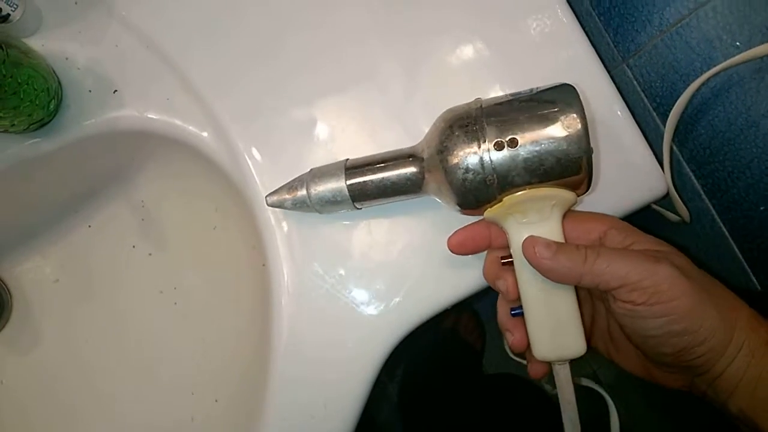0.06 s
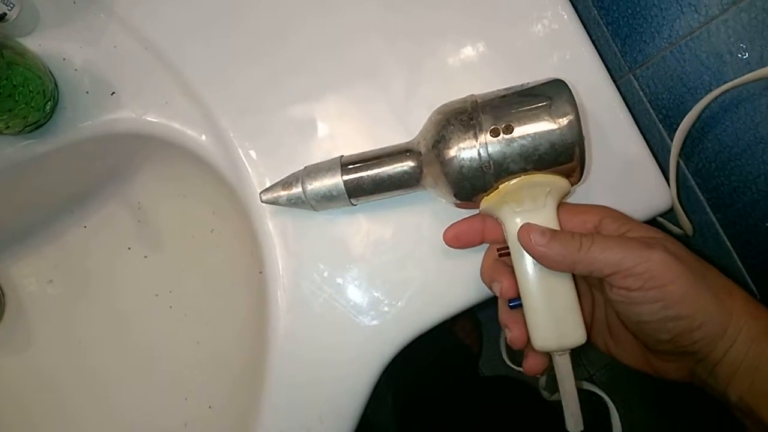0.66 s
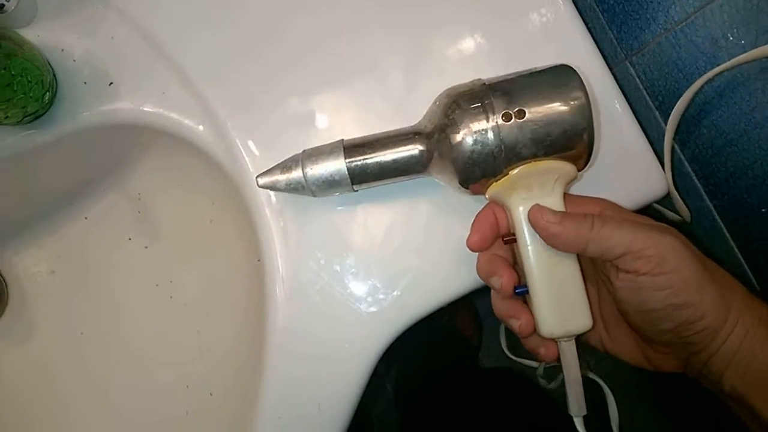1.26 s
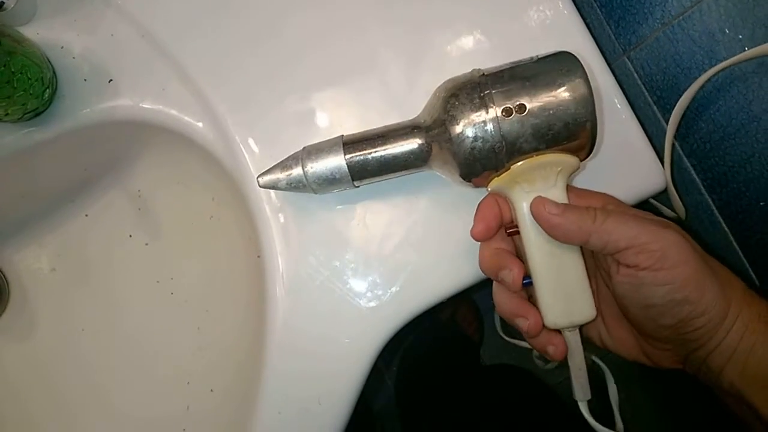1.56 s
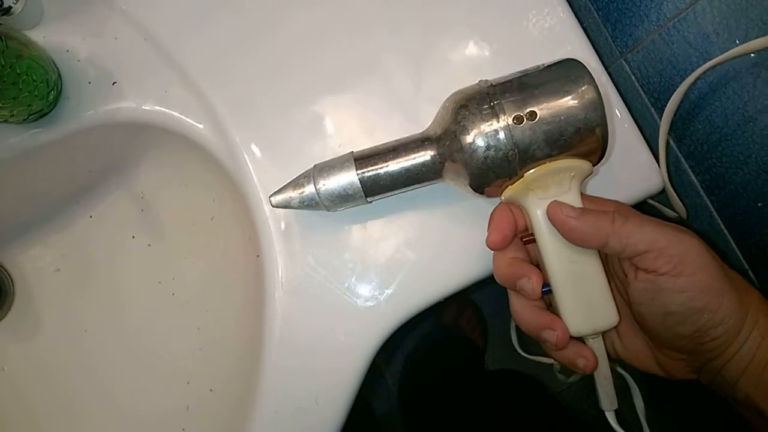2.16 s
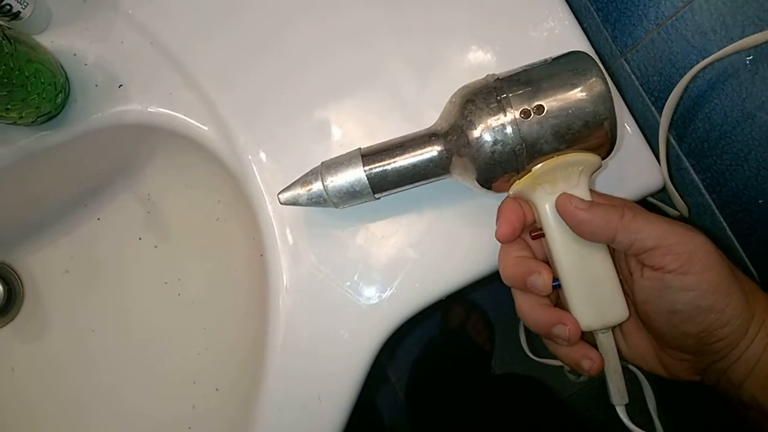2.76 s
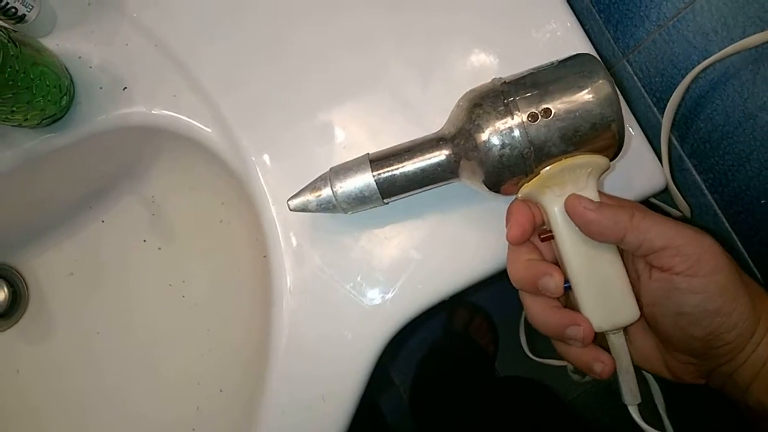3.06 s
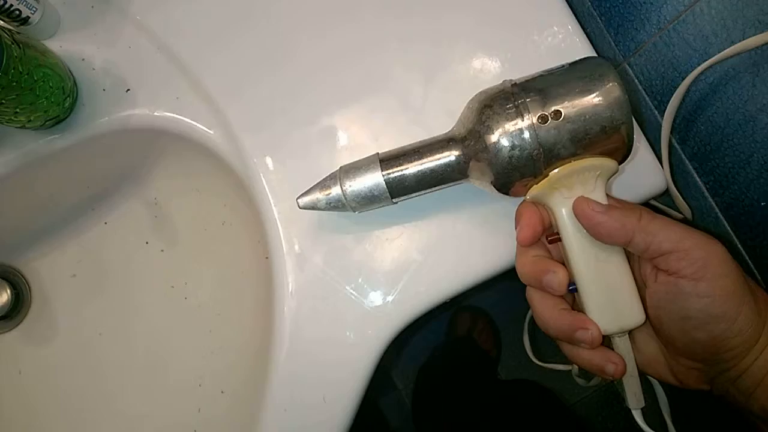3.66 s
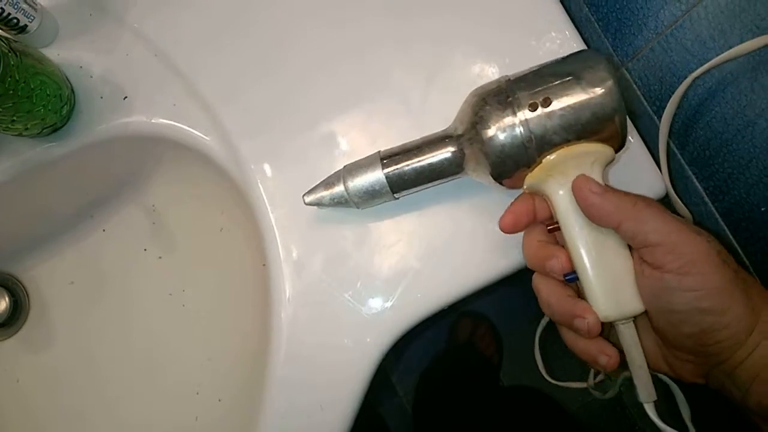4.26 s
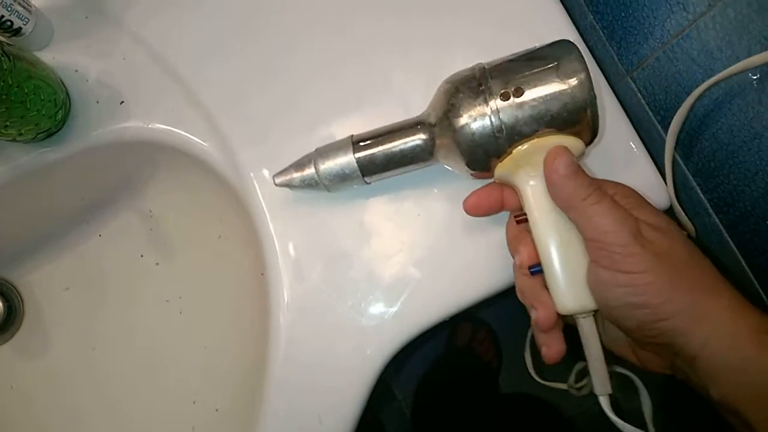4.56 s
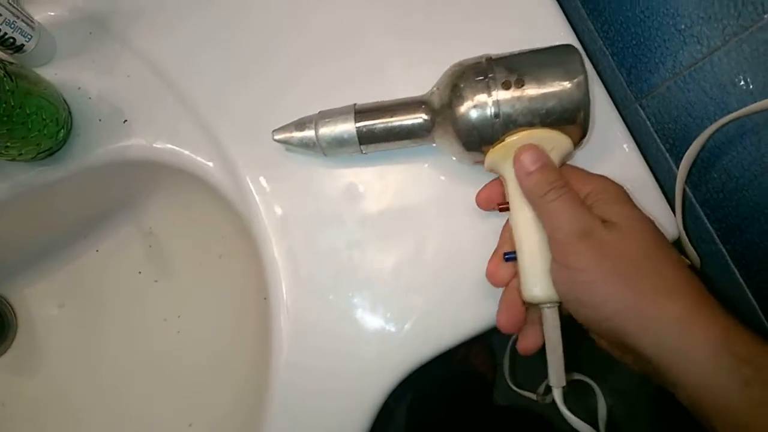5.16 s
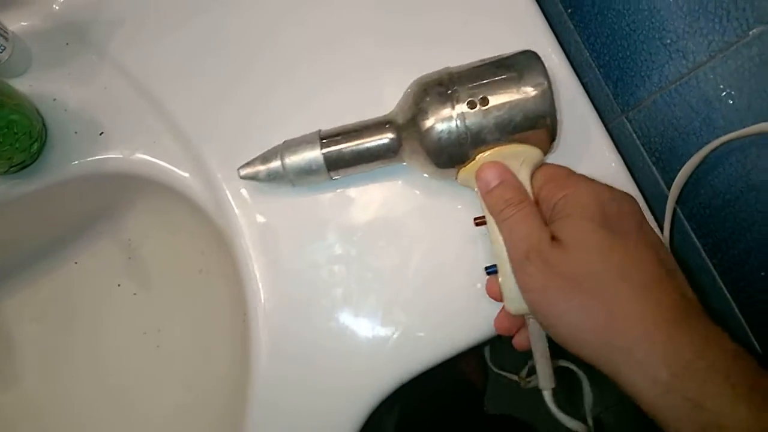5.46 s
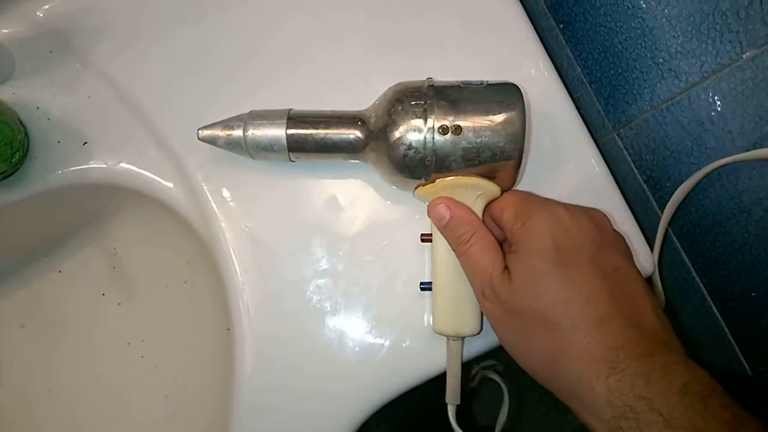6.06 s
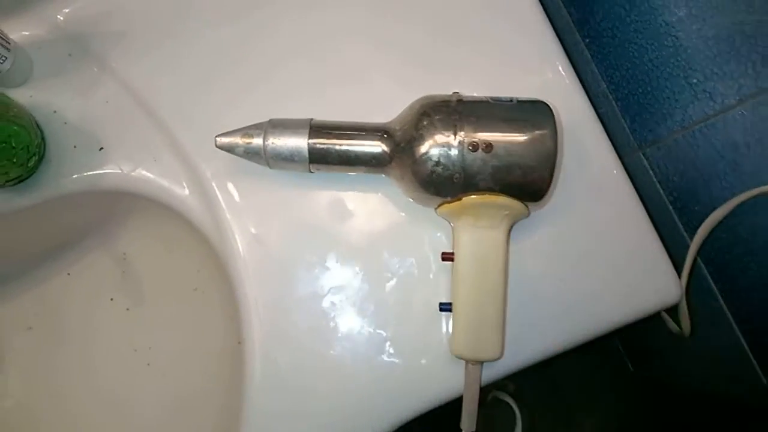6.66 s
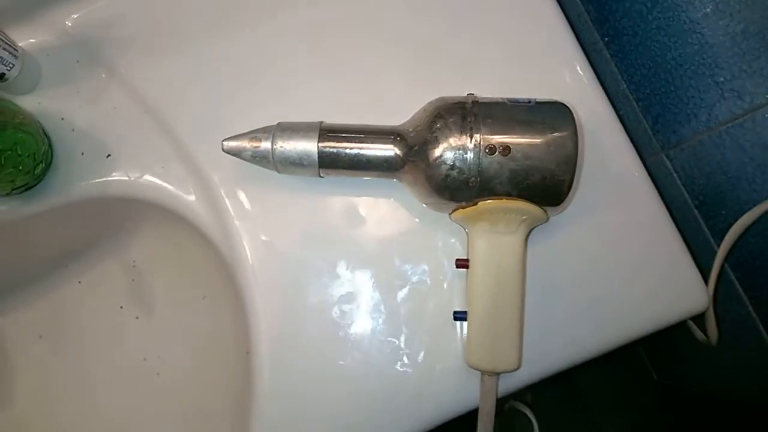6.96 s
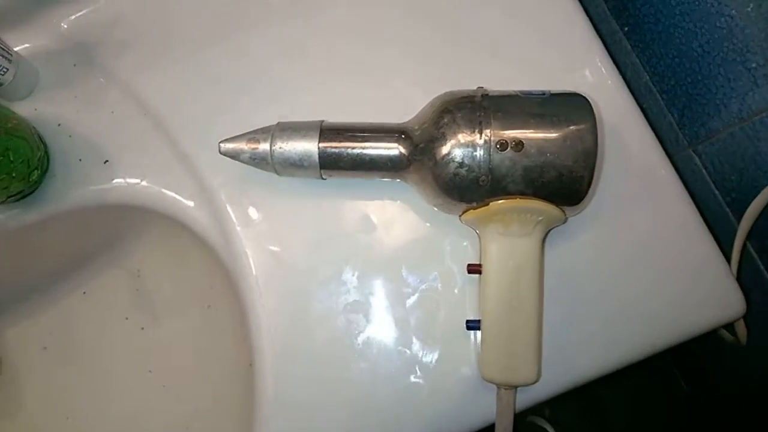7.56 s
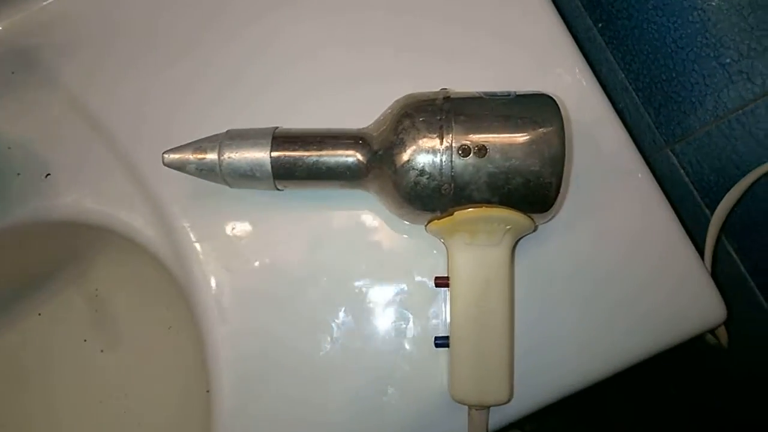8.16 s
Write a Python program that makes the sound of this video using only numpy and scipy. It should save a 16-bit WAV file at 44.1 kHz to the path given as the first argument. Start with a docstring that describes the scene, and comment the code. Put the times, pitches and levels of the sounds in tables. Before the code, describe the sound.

A hair dryer whines and blows, clicks off and winds down, then knocks against a washbasin and rocks to rest.

```python
"""A tiled bathroom, the microphone by the washbasin. An old metal hair dryer runs: its fan whines, air
rushes through the housing, the brushes hiss, and at first the jet rasps over the basin's rim.
At 3.2 s it is switched off and coasts down. From 4.9 s it knocks on the basin as it is laid down,
and from 6.75 s it rocks to rest. Among faint scuffs, two dry ticks sound right at the microphone.
Under it all lie the hiss of the room and the rumble of the building."""
import sys
import numpy as np
from scipy import signal
from scipy.fft import rfft, irfft, next_fast_len
from scipy.io import wavfile

SR = 44100
rng = np.random.default_rng(int(sys.argv[2]) if len(sys.argv) > 2 else 0)


def to_wav(sig):
    """Store sig (one row per channel, or 1-D mono) as 16-bit WAV at the path in sys.argv[1].

    Samples outside -1..1 are clipped; the rate is SR.
    """
    pcm = np.clip(np.atleast_2d(sig), -1, 1) * 32767
    pcm = np.round(pcm).astype(np.int16)
    wavfile.write(sys.argv[1], SR, pcm.T)  # frames by channels


N = 370881
TIME = np.arange(N) / SR

# resonances and notches of the dryer's housing and nozzle: centre_hz, width_hz, gain_db
HOUSING_RESONANCES = [(336, 16, 8.5), (475.6, 45, 7.5), (636.6, 31, 7), (813, 30.1, 0.5),
                      (909.3, 101.2, 7.5), (1335.9, 143.3, 12.5), (1522.4, 92, 5.5), (1905.4, 50, 7),
                      (2089.6, 170, 9), (2664, 150, 1), (3235, 120, -7), (3631, 430, 3.5),
                      (4252, 243.4, -13), (4856, 230, 4.5), (6100, 270, 5)]
# low modes of the basin and its cabinet: pitch_hz, level_db, t60_s
BASIN_MODES = [(78, -14, .22), (103, 1, .34), (148, -9, .28), (172, -5, .28), (186, -7, .28),
               (213, -6, .32), (236, -2, .35), (254, -6, .32), (298, -11, .32), (409, -19, .24),
               (470, -19, .26)]


def amp(db):
    """Decibels to amplitude."""
    return 10 ** (np.asarray(db) / 20)


def unit(x):
    """Scales to rms 1."""
    return x / np.sqrt(np.mean(x ** 2) + 1e-20)


def curve(rows):
    """A control curve at every sample."""
    return np.interp(TIME, *np.transpose(rows))


def read(points, hz):
    """Interpolates a table on a log-frequency axis."""
    f, value = np.transpose(points)
    return np.interp(np.log(hz + 1), np.log(f + 1), value)


def peaks_db(peaks, hz):
    """Gain of a set of resonances and notches at the given frequencies."""
    return sum(gain_db / (1 + (2 * (hz - f) / width) ** 2) for f, width, gain_db in peaks)


def add(mix, start_s, sound):
    """Lays a sound into the mix."""
    part = mix[round(start_s * SR):][:len(sound)]
    part += sound[:len(part)]


def band(x, hz, kind, order=2):
    """Low-pass or high-pass."""
    return signal.sosfilt(signal.butter(order, min(hz, .45 * SR), kind, fs=SR, output="sos"), x)


def wander(hz):
    """Slow random drift, rms 1, up to the given rate."""
    t = TIME[::100]
    f = np.fft.rfftfreq(len(t), t[1])
    spectrum = rfft(rng.standard_normal(len(t))) / (1 + (f / hz) ** 4)
    return np.interp(TIME, t, unit(irfft(spectrum, len(t))))


def noise(colour, peaks=(), ripple_db=0, ripple_hz=25):
    """Noise of a given colour, with resonances and the fine comb of nearby reflections."""
    size = next_fast_len(N, True)
    hz = np.fft.rfftfreq(size, 1 / SR)
    grid = np.arange(0, SR / 2, ripple_hz)
    comb = np.interp(hz, grid, rng.standard_normal(len(grid)))
    db = read(colour, hz) + peaks_db(peaks, hz) + ripple_db * comb * hz / (hz + 1500)
    return unit(irfft(rfft(rng.standard_normal(size)) * amp(db), size)[:N])


def shifting(sounds, hz):
    """Fades round three versions of a sound at even power, as reflections change with the moving hand."""
    return sum(x * np.sqrt(2 / 3) * np.cos(np.pi * (hz * TIME + k / 3)) for k, x in enumerate(sounds))


def ring(modes, t):
    """Dying sines of a struck body; neighbouring modes swing opposite ways."""
    return sum((-1) ** k * amp(db - 60 * t / t60) * np.sin(2 * np.pi * hz * t)
               for k, (hz, db, t60) in enumerate(modes))


def bathroom(x):
    """Dense echoes reach the microphone from the tiles, each band dying at its own speed."""
    # decay of the room: frequency_hz, t60_s
    decay_times = [(100, 0.844), (400, 0.298), (1500, 0.407), (5000, 0.255), (15000, 0.12)]
    hz, t, bands = signal.stft(rng.standard_normal(SR * 3 // 4), SR, nperseg=256)
    decay = amp(-60 * t / read(decay_times, hz)[:, None])
    tail = signal.istft(bands * decay, SR, nperseg=256)[1]
    return signal.fftconvolve(x, tail / np.linalg.norm(tail))[:N]


def blade_pitch():
    """Nearly steady under power; then air drag (speed squared) and constant friction brake the fan."""
    # blade-passing pitch under power: time_s, pitch_hz
    powered_pitch = [(0, 1276.5), (.25, 1276), (.68, 1269), (1.35, 1267), (2.0, 1274), (2.6, 1281),
                     (3.2, 1283.5)]
    off_s, coast_s = 3.228, 1.6486  # the power is cut; the rotor's time constant
    drag_hz = 706.2  # here air drag and bearing friction brake equally
    coasted = np.maximum(TIME - off_s, 0) / coast_s
    return drag_hz * np.tan(np.maximum(np.arctan(curve(powered_pitch) / drag_hz) - coasted, 0))


def blade_whine(blade_passes, blade_hz, speed, coasting):
    """Blades whine past the outlet; unpowered, the tone drops and slides through housing resonances."""
    # the whine at the microphone as the dryer turns in the hand: time_s, level_db
    whine_levels = [(0.05, -22), (0.18, -20.5), (0.56, -22.5), (0.61, -24.5), (1.56, -27), (1.99, -23),
                    (2.36, -25), (2.71, -20.5), (3.2, -22)]
    # the outlet radiates low pitches poorly: frequency_hz, gain_db
    outlet_response = [(150, -45.5), (330, -23), (460, -19), (640, 0)]
    unpowered_db, housing_share = -5, .5
    resonance_db = peaks_db(HOUSING_RESONANCES, blade_hz)
    coasting_db = coasting * (unpowered_db + housing_share * (resonance_db - resonance_db[0]))
    level_db = curve(whine_levels) + coasting_db + read(outlet_response, blade_hz) + .31 * wander(hz=30)
    whine = np.sqrt(2) * amp(level_db) * speed ** .63 * np.sin(2 * np.pi * blade_passes)
    # while the pitch falls, the room holds the earlier pitches and they beat with the new one
    return whine + amp(-7) * bathroom(whine * coasting)


def shaft(turns):
    """Overtones of the shaft: each swells slowly by chance and flutters in the air stream."""
    # strongest overtones: multiple, level_db
    overtones = [(1, -59.5), (9, -56), (12, -50), (18, -52), (22, -60), (24, -59), (47, -59), (54, -58.5),
                 (57, -59.5), (59, -57), (62, -59.5), (65, -62), (67, -61)]
    swell_db, flutter_db = 3.5, 2
    out = np.zeros(N)
    for multiple, db in overtones:
        drift_db = swell_db * wander(hz=.76) + flutter_db * wander(hz=16)
        out += np.sqrt(2) * amp(db + drift_db) * np.sin(2 * np.pi * (multiple * turns + rng.random()))
    return out


def commutator(turns, size=2048):
    """Uneven bars repeat one random pattern every turn: a comb of thin lines on the shaft's multiples."""
    # outline of the comb: multiple, level_db
    outline = [(4, -90), (8, -60), (28, -62), (36, -65), (73, -62), (78, -140)]
    level = amp(read(outline, np.arange(size // 2 + 1)))
    patterns = [irfft(level * np.exp(2j * np.pi * rng.random(len(level)))) * size / 2 for _ in range(3)]
    return shifting([np.interp(turns % 1 * size, np.arange(size), p) for p in patterns], hz=.28)


def fan(blade_hz, speed):
    """One rotor drives blades, shaft and commutator; the field coil hums until the power is cut."""
    blades, unpowered_db, hum_hz = 6, -5, 100
    turns = np.cumsum(blade_hz * (1 + .0004 * wander(hz=25))) / SR / blades
    coasting = np.clip((1 - speed) / .04, 0, 1)  # reaches 1 once the speed has fallen by 4 %
    whine = blade_whine(blades * turns, blade_hz, speed, coasting)
    motor = (shaft(turns) + commutator(turns)) * amp(coasting * unpowered_db) * speed ** 4.7
    hum = np.sin(2 * np.pi * hum_hz * TIME) * (1 - coasting)
    return whine + motor + amp(-58) * hum


def airflow(speed):
    """Turbulence in the housing dies steeply as the fan slows, the low eddies more gently."""
    # rushing air: frequency_hz, density_db
    rush_colour = [(40, -44), (140, -30), (220, -18), (330, -18.5), (600, -4), (920, -4), (1130, -12.5),
                   (1700, -16), (2200, -16), (3200, -17), (5200, -21.5), (6300, -26), (7200, -37.5),
                   (16000, -55)]
    # slow eddies round the fan: frequency_hz, density_db
    eddy_colour = [(100, -26), (220, -10), (340, 0), (700, 1), (1100, -33.5), (3000, -45)]
    rush = noise(rush_colour, HOUSING_RESONANCES, ripple_db=5) * amp(-27 + .28 * wander(hz=15))
    eddies = noise(eddy_colour, HOUSING_RESONANCES) * amp(-37 + 1.5 * wander(hz=20))
    return rush * speed ** 3.3 + eddies * speed ** 2.172


def brushes(speed):
    """The brushes slide on the commutator, and their hiss rings in the nozzle."""
    # sliding hiss: frequency_hz, density_db
    hiss_colour = [(200, -16), (340, 1.5), (700, -11), (1100, -9.5), (2800, -10.5), (4700, -2),
                   (6000, -5.5), (7400, -4), (10500, -1), (12500, 0.5), (14000, -1), (16000, -2)]
    # resonance of the nozzle: centre_hz, width_hz, gain_db
    nozzle = [(1337, 120, 14)]
    hiss = shifting([noise(hiss_colour, nozzle, ripple_db=5, ripple_hz=70) for _ in range(3)], hz=.3)
    return hiss * amp(-40.5 + .48 * wander(hz=18)) * speed ** 1.232


def jet(speed):
    """The stream from the nozzle rasps over the rim and buffets the bowl; it dies with the fan."""
    # the jet's sweep across the basin: time_s, rasp_db, buffet_db
    sweep = [(0, -43, -62.5), (.22, -38.5, -50), (.32, -34.5, -38.5), (.48, -29.5, -40), (.57, -39, -45),
             (.93, -35.5, -39.5), (1.1, -41, -47.5), (1.5, -63.5, -72.5)]
    # rasp on the rim: frequency_hz, density_db
    rasp_colour = [(200, -10), (600, -1.5), (2500, 3), (3200, -2), (4000, 2.5), (5400, -5.5), (6400, -2.5),
                   (7800, -12), (16000, -18)]
    # buffeting in the bowl: frequency_hz, density_db
    buffet_colour = [(50, -28.5), (80, -14.5), (105, 11), (140, -20), (220, 3), (400, -16), (1000, -43)]
    time_s, rasp_db, buffet_db = np.transpose(sweep)
    rasp = noise(rasp_colour, ripple_db=3.5) * amp(np.interp(TIME, time_s, rasp_db))
    buffet = noise(buffet_colour) * amp(np.interp(TIME, time_s, buffet_db))
    return (rasp + buffet) * speed ** 3.4


def room_tone():
    """Faint steady hiss and the low rumble of the building."""
    # the quiet room: frequency_hz, density_db
    hiss_colour = [(150, 9), (260, -2), (400, -3), (600, -9.5), (1400, -11.5), (1600, -6.5), (1800, -9),
                   (3200, -14.5), (3900, -6.5), (4900, -5.5), (8000, -10), (10700, -10), (12600, 0.5),
                   (15500, -6.5)]
    # faint thin tones in the hiss: centre_hz, width_hz, gain_db
    thin_tones = [(1560, 50, 3), (4043, 30, 5.5), (4724, 36, 10.5), (6498, 30, 8), (12654, 40, 7)]
    # the building: frequency_hz, density_db
    rumble_colour = [(22, -32.5), (33, -20), (41, 9.5), (50, 5), (62, -12.5), (80, -10.5), (102, -2.5),
                     (130, -12.5), (200, -18.5), (400, -44.5)]
    return amp(-59) * noise(hiss_colour, thin_tones, ripple_db=3) + amp(-58.5) * noise(rumble_colour)


def switches():
    """Short bright snaps of the switches in the handle."""
    # switch clicks: start_s, level_db, low_hz, high_hz
    clicks = [(3.225, -14.5, 7500, 16100), (3.249, -10.5, 4000, 16000), (3.268, -16, 8500, 16000),
              (3.718, -8.5, 2680, 4970)]
    out, t = np.zeros(N), np.arange(SR // 10) / SR
    for start_s, db, low_hz, high_hz in clicks:
        snap = rng.standard_normal(len(t)) * np.exp(-t / .006)
        add(out, start_s, amp(db) * band(band(snap, low_hz, "high", order=8), high_hz, "low", order=1))
    return amp(-15.5) * out + amp(-19.5) * bathroom(out)


def knocks():
    """Each blow clacks the metal shell and thuds the basin; a soft one reaches only the lowest modes."""
    # the dryer meets the basin: start_s, thud_db, thud_cutoff_hz, clack_db, clack_cutoff_hz
    blows = [(4.875, -48, 600, -20, 4900), (5.127, -28.5, 500, -14.5, 5400), (5.137, -49.5, 500, -18, 8900),
             (5.181, -28, 400, -15.5, 3300), (5.508, -44, 600, -26, 850), (5.716, -37.5, 230, -37, 2560),
             (5.744, -37.5, 190, -35.5, 700), (5.792, -36.5, 190, -39, 700), (5.913, -47, 600, -15, 1914)]
    # modes of the metal shell: pitch_hz, level_db, t60_s
    shell_modes = [(850, -7, .12), (1206, -14, .1), (1630, -4, .2), (2300, -9, .16), (3150, -18, 1.4),
                   (3590, 2, .16), (3760, -3, .14), (4070, -1, .2), (4673, -3, .18), (6290, -3, .2),
                   (10870, 0, .18)]
    spot_db = 1.5  # each blow strikes another spot, so the modes vary in strength
    clacks, thuds, t = np.zeros(N), np.zeros(N), np.arange(SR * 3 // 4) / SR
    basin = ring(BASIN_MODES, t)
    for start_s, thud_db, thud_cutoff_hz, clack_db, clack_cutoff_hz in blows:
        shell = ring([(hz, db + spot_db * rng.standard_normal(), t60) for hz, db, t60 in shell_modes], t)
        crack = rng.standard_normal(len(t)) * np.exp(-t / .00576)
        burst = rng.standard_normal(len(t)) * np.exp(-t / .01036)
        hollow = band(band(burst, 250, "high"), 827, "low", order=3)
        clack = crack + amp(3.5) * hollow + amp(-28) * shell
        add(clacks, start_s, amp(clack_db) * band(clack, clack_cutoff_hz, "low"))
        add(thuds, start_s, amp(thud_db) * band(basin, thud_cutoff_hz, "low"))
    direct = amp(-11.5) * clacks + amp(1.5) * thuds
    return direct + amp(-11.5) * (bathroom(clacks) + bathroom(thuds))


def rocking():
    """The dryer rolls on its round belly, each swing quicker and weaker; the basin booms after each."""
    start_s, first_swing_s, swings = 6.75, .2448, 9
    swing_ratio, swing_loss_db = .919, 1.2256  # from one swing to the next
    rolls, t = np.zeros(N), np.arange(SR // 2) / SR
    boom = band(ring(BASIN_MODES, t), 191, "low") * (1 - np.exp(-t / .099))
    envelope = np.exp(-t / .059) * (1 - np.exp(-t / .0022))
    for k in range(swings):
        onset_s = start_s + first_swing_s * np.sum(swing_ratio ** np.arange(k))
        rub = rng.standard_normal(len(t))
        roll = unit(band(band(rub, 290, "low", order=6), 195, "high", order=4))
        roll += amp(-10) * unit(band(rub, 550, "low", order=3))
        add(rolls, onset_s, amp(-42.5 - swing_loss_db * k) * (roll * envelope + amp(15.5) * boom))
    return amp(-4.5) * rolls + amp(-12.5) * bathroom(rolls)


def scuffs():
    """Soft brief rubs of handling."""
    # faint rubs: start_s, level_db, length_s, cutoff_hz
    rubs = [(7.218, -50, 0.0298, 3200), (7.323, -65.5, 0.0376, 3200), (7.587, -66, 0.022, 1400),
            (7.674, -62.5, 0.0505, 1190), (8.373, -59.5, 0.05, 870)]
    out = np.zeros(N)
    for start_s, db, length_s, cutoff_hz in rubs:
        window = signal.windows.tukey(int(length_s * SR), .5)
        rub = unit(band(rng.standard_normal(len(window)), cutoff_hz, "low", order=4))
        add(out, start_s, amp(db) * window * rub)
    return out + amp(-12.5) * bathroom(out)


def ticks():
    """Heavily damped taps on the case that holds the microphone, too near to stir the room much."""
    # close taps: start_s, level_db, pitch_hz, decay_s, cutoff_hz, edge_db
    taps = [(7.2373, -16, 1273, 0.00065, 11100, 7), (7.932, -4, 994, 0.000412, 4080, -6.5)]
    out, t = np.zeros(N), np.arange(SR // 50) / SR
    # the hard edge of the first contact
    edge = np.exp(-t / .00021) * np.sin(2 * np.pi * 3200 * t) + .154 * np.exp(-t / .00005)
    for start_s, db, pitch_hz, decay_s, cutoff_hz, edge_db in taps:
        body = np.exp(-t / decay_s) * np.sin(2 * np.pi * pitch_hz * t)
        tap = band(body + amp(edge_db) * edge, cutoff_hz, "low", order=4)
        add(out, start_s, amp(db) * band(tap, 173, "high"))
    return out + amp(-36.5) * bathroom(out)


def scene():
    """The dryer, its handling and the room, at one microphone by the basin."""
    blade_hz = blade_pitch()
    speed = blade_hz / blade_hz[0]
    handling = switches() + knocks() + rocking() + ticks() + scuffs()
    dryer = fan(blade_hz, speed) + airflow(speed) + brushes(speed) + jet(speed)
    return (dryer + handling + room_tone())[None]


def record(dry):
    """The recorder's steep band limit at 15.8 kHz."""
    low_pass = signal.firwin(801, 15800, window=("kaiser", 9), fs=SR)
    return signal.oaconvolve(dry, low_pass[None], "same")


dry = scene()
out = record(dry)
to_wav(out)
```